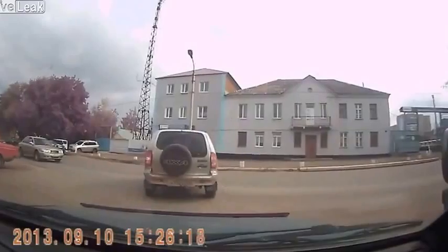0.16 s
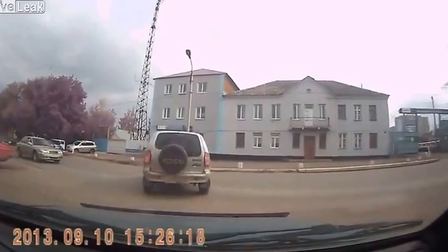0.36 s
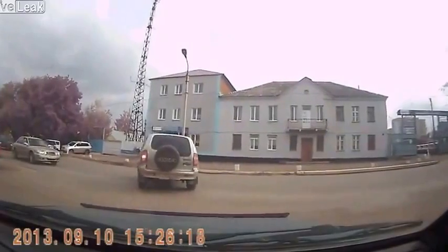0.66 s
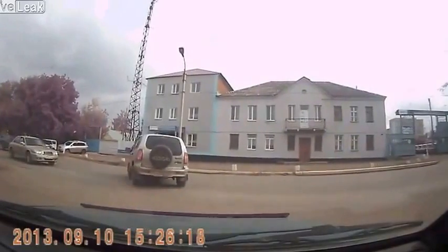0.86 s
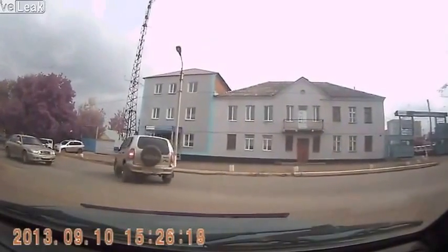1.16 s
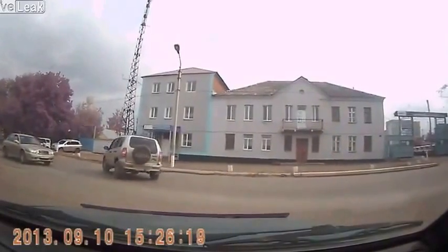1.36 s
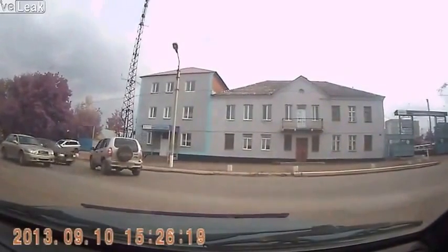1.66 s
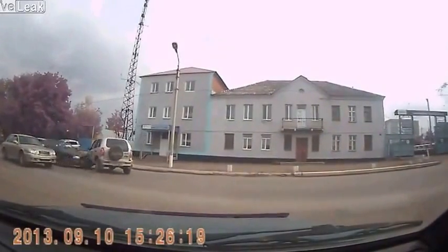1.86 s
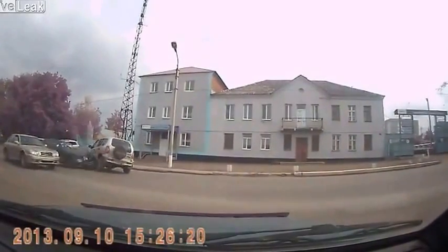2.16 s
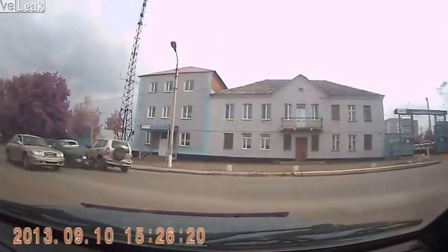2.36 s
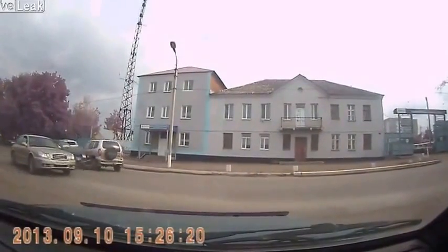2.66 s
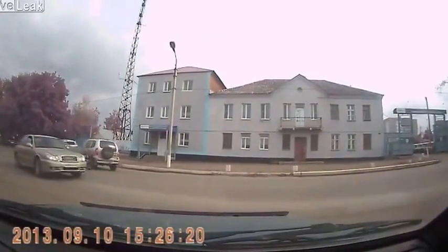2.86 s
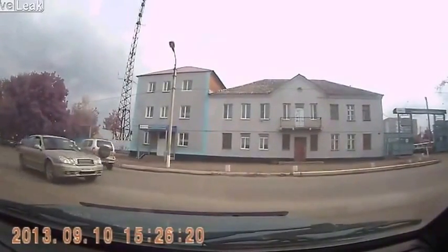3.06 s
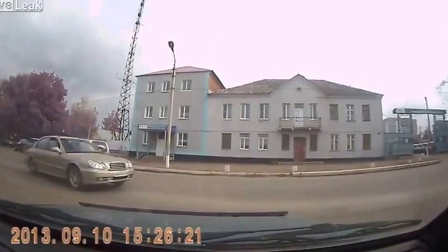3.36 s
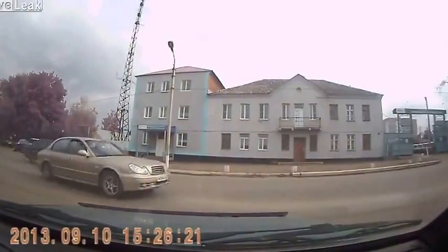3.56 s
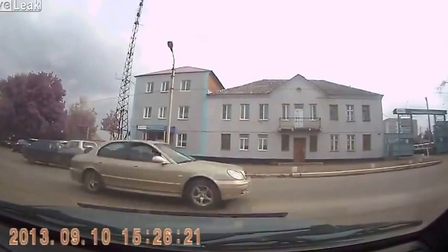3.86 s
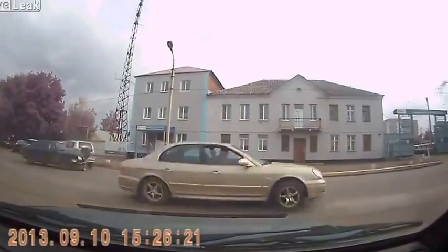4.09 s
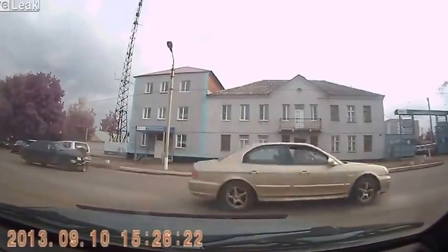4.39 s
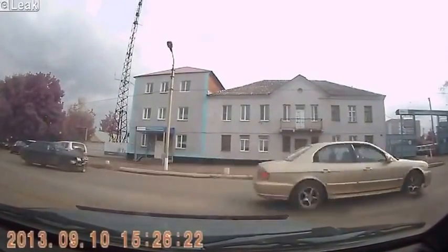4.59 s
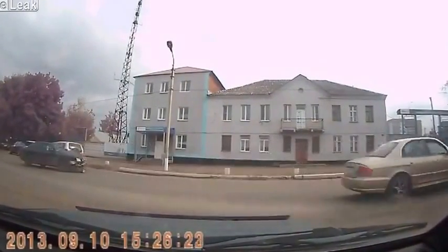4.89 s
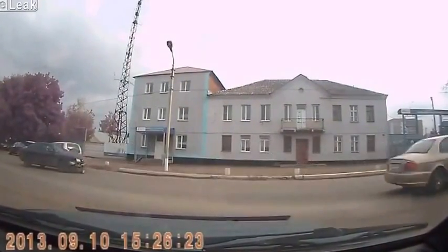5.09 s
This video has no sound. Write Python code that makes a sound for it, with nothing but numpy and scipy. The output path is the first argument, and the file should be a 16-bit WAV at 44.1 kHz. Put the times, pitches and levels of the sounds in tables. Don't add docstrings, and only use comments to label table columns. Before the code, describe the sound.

Inside an idling car, a low engine throb continues while tyres squeal roughly outside, cars meet in a dull metal crunch, then soft cabin thumps follow.

```python
import sys
import numpy as np
from scipy import signal
from scipy.fft import rfft, irfft
from scipy.io import wavfile
from scipy.ndimage import uniform_filter1d

SR = 44100
rng = np.random.default_rng(int(sys.argv[2]) if len(sys.argv) > 2 else 0)


def wav_out(sig):
    wavfile.write(sys.argv[1], SR, np.round(np.clip(np.atleast_2d(sig).T, -1, 1) * 32767).astype(np.int16))


def volts_from_db(level):
    exponent = np.asarray(level, float) / 20
    return 10 ** exponent


N = 230863

# (time [s], level [dB])
LOAD = [(0, -31.5), (.22, -18.5), (.36, -35), (.44, -35), (.6, -20.5), (.7, -29.5), (.9, -28),
        (1.15, -37.5), (1.5, -40.5), (2.05, -39.5), (2.15, -24), (2.42, -47), (2.65, -33), (3.15, -34),
        (3.5, -39), (4.3, -41.5), (4.9, -46.5), (5.23, -37)]
# (frequency [Hz], level per Hz [dB])
COLOUR = [(120, -35), (200, -3), (259, -0.5), (306, -4), (406, -8), (598, -11), (915, -16.5), (1310, -8.5),
          (1420, -20.5), (1720, -25.5), (2060, -16.5), (2440, -26.5), (3360, -24.5), (3680, -26),
          (4350, -26), (5660, -53), (9570, -120)]


def level(x):
    return x / np.sqrt(np.mean(x ** 2))


def curves(table):
    s, *columns = np.transpose(table)
    t = np.arange(N) / SR
    inside = 1.0 * ((t >= s[0]) & (t <= s[-1]))
    gate = uniform_filter1d(inside, size=441)
    return [np.interp(t, s, c) for c in columns] + [gate]


def bumps(rows, weights=None):
    t = np.arange(N) / SR
    weights = np.ones(len(rows)) if weights is None else weights
    return sum(w * r[1] * np.exp(-0.5 * ((t - r[0]) / r[2]) ** 2) for r, w in zip(rows, weights))


def arch(start, length, first_hz, last_hz, peak_db):
    share = np.array([0, 0.067, 1 - 0.14, 1])
    hz = first_hz + (last_hz - first_hz) * share
    db = peak_db - 16 * np.array([1, 0, 0, 1])
    return np.transpose([start + length * share, hz, db])


def walk(rate, size=N):
    k = int(SR / rate)
    steps = np.repeat(rng.standard_normal(N // 20)[:size // k + 1], k)
    return level(uniform_filter1d(uniform_filter1d(steps, k), k)[:size])


def shape(x, spectrum):
    hz, db = np.transpose(spectrum)
    grid = np.maximum(np.fft.rfftfreq(8192, 1 / SR), 1)
    ceps = irfft(np.interp(np.log(grid), np.log(hz), db) * np.log(10) / 20)
    ceps[1:4096] *= 2
    ceps[4097:] = 0
    response = irfft(np.exp(rfft(ceps)))[:4096]
    return signal.fftconvolve(x, response)[:len(x)]


def band(x, lo_hz, hi_hz):
    return level(signal.sosfilt(signal.butter(3, [lo_hz, hi_hz], "band", fs=SR, output="sos"), x))


def ring(x, hz, width):
    return signal.lfilter(*signal.iirpeak(hz, hz / width, SR), x)


def glass(x):
    # (frequency [Hz], width [Hz], level [dB])
    pane = [(1170, 150, -6.5), (1310, 150, -7.5), (1507, 120, 4.5), (1980, 220, -0.5), (2247, 92, 0),
            (2540, 150, 4), (2907, 130, 4), (3660, 68, 6.5), (4310, 130, -4)]
    return (x + sum(volts_from_db(db) * ring(x, f, w) for f, w, db in pane)) / 1.905


def engine():
    # (time [s], firing rate [Hz], boom level [dB])
    firings = [(0, 25.58, -19), (.2, 26.03, -18.5), (.3, 26.6, -14.5), (.5, 27.12, -20), (.68, 24, -15),
               (.8, 23.48, -20.5), (1.02, 23.53, -23.5), (1.2, 23.5, -21.5), (1.31, 31.4, -23),
               (1.5, 31.08, -23), (1.9, 30.4, -29.5), (2.14, 29.77, -23.5), (2.65, 28.65, -23.5),
               (3.2, 29.12, -27), (3.56, 28.09, -20.5), (3.95, 29.37, -25), (4.15, 29, -18.5),
               (5.23, 29.6, -21.5)]
    # (time [s], change [dB], half length
    # [s])
    stumbles = [(.43, -20.5, 0.02), (.9, -6.5, 0.046), (1.12, -9, 0.018), (1.22, -11, .025),
                (2.44, -13.5, 0.09), (2.79, -3.5, 0.024), (3.22, -2, 0.026), (3.34, 0.5, .04),
                (4.3, -6, 0.025), (4.72, -2.5, .03), (4.96, -2, 0.063), (5.1, 2.5, .04)]
    hz, boom_db, _ = curves(firings)
    load_db, _ = curves(LOAD)
    pulling = uniform_filter1d(1.0 * (np.arange(N) < 1 * SR), size=2000)
    turns = 0.17 + np.cumsum(hz * (1 + 0.0097 * walk(20))) / SR

    boom = volts_from_db(boom_db + bumps(stumbles)) * np.sin(2 * np.pi * turns)
    boom += volts_from_db(load_db + 4.4 * walk(22)) * np.sin(4 * np.pi * turns + 0.72)
    boom += pulling * volts_from_db(load_db - 18 + 2.7 * walk(2.7)) * np.sin(6 * np.pi * turns + 5.4)
    boom += pulling * volts_from_db(load_db - 13.5 + 1.9 * walk(8)) * np.sin(10 * np.pi * turns + 2.2)
    return np.sqrt(2) * boom, turns % 1


def cabin(phase):
    # (time [s], level [dB])
    traffic = [(0, -32), (.21, -30), (.39, -45.5), (.46, -46), (.5, -38.5), (.72, -37), (.8, -45.5),
               (1.2, -49), (2.05, -47), (2.79, -47), (2.85, -43), (3.0, -41.5), (3.25, -45), (3.62, -46.5),
               (4.08, -43), (4.5, -44), (4.9, -43), (5.23, -39)]
    # (time [s], change [dB], half length [s], lean to the bass [share])
    jolts = [(0.505, 4.5, 0.03, 1), (.64, 2, 0.045, 0.65), (1.01, 4.5, 0.018, .5), (1.4, 4.5, 0.025, .3),
             (2.56, -1, .09, 1), (2.971, 1, 0.035, -3), (3.122, 2, 0.046, -0.94), (3.231, 2, 0.055, 0.77),
             (3.446, 8, 0.04, 0.86), (3.55, 6, 0.017, 0.55), (3.798, 6.5, 0.018, -0.35),
             (3.924, 11, 0.032, 0.21), (4.056, 7.5, 0.048, .3), (4.622, 2, 0.026, -1.5),
             (4.716, 5, 0.037, 0.95), (4.78, -1, 0.071, 1), (4.865, -3, .025, 0.23),
             (5.002, 4, 0.026, -1.23), (5.139, 4.5, 0.023, -0.38)]
    # (frequency [Hz], width [Hz], level [dB])
    panels = [(55, 16, -3), (81.4, 30, 0), (135, 47.4, -1)]
    # (frequency [Hz], width [Hz], level [dB])
    hollow = [(325, 42, -14.5), (554, 150, -8)]
    base_db, _ = curves(traffic)
    jolt_db, lean_db = bumps(jolts), bumps(jolts, np.transpose(jolts)[3])
    mid_db = base_db + jolt_db
    low_db = -35 + 0.65 * (mid_db + 41) + lean_db + 0.3 * (curves(LOAD)[0] + 38)
    high_db = -57.5 + 0.88 * (mid_db + 42.5) - lean_db

    depth = np.clip(0.32 + 0.045 * walk(3), 0, 1)
    puff = level(np.exp(-((phase - 0.3) % 1) / 0.35))
    throb = 1 - depth + depth * puff

    rumble = 0
    for f, w, db in panels:
        rumble = rumble + volts_from_db(db + 2.1 * walk(9)) * level(ring(ring(rng.standard_normal(N), f, w), f, w))
    noise = shape(rng.standard_normal(N) * volts_from_db(1.2 * walk(400)), COLOUR)
    low = signal.sosfiltfilt(signal.butter(2, 850, fs=SR, output="sos"), noise)
    air = level(low) + sum(volts_from_db(db) * level(ring(low, f, w)) for f, w, db in hollow)
    hiss = level(glass(noise - low))

    out = volts_from_db(low_db + 0.5) * level(rumble)
    out += volts_from_db(mid_db - 1 + 1.2 * walk(25)) * air * throb ** 0.6
    return out + volts_from_db(high_db + 6 + 1.2 * walk(30)) * hiss * throb


def squeal(table, overtones_db, wander, spread, flutter_db, count, scrub_db, grabs_db=np.zeros(N), smear=1.0):
    columns = curves(table)
    on = columns[-1] > 0
    hz, slide_db, gate = (c[on] for c in columns)
    peak_db, grip_db, n = np.max(slide_db), slide_db + grabs_db[on], len(hz)
    dbs = [grip_db] + [peak_db + db + 0.7 * (grip_db - peak_db) for db in overtones_db]

    waves = np.zeros((3, n))
    for k in range(count):
        offset = spread * (k - (count - 1) / 2)
        jitter = wander * (0.35 * walk(30, size=n) + walk(300, size=n))
        turns = np.cumsum(hz * (1 + offset + jitter)) / SR
        blur = np.cumsum(hz * wander * smear * walk(350, size=n)) / SR
        grip = volts_from_db(flutter_db * np.tanh(0.8 * walk(85, size=n)))
        for h in range(3):
            waves[h] += grip * np.sin(2 * np.pi * ((h + 1) * turns + h * blur))

    scrub = volts_from_db(dbs[1] + scrub_db) * band(rng.standard_normal(N)[:n], 1400, 4600)
    out = np.zeros(N)
    out[on] = gate * (scrub + sum(volts_from_db(db) * level(w) for db, w in zip(dbs, waves)))
    return out


def tyres():
    # (time [s], slip rate [Hz], level [dB])
    bite = [(.8, 1520, -72.5), (.92, 1556, -58.5), (.99, 1385, -37.5), (1.19, 1387, -34.5)]
    outer = [(1.17, 1330, -46), (1.25, 1310, -29.5), (1.55, 1310, -30.5), (1.64, 1312, -30.5),
             (1.8, 1311, -26), (1.9, 1293, -23.5), (2.04, 1319, -28), (2.16, 1310, -24),
             (2.24, 1332, -54.5)]
    inner = [(1.2, 1180, -47.5), (1.32, 1170, -41.5), (1.64, 1170, -38), (1.8, 1145, -32.5),
             (1.87, 1170, -26.5), (1.92, 1158, -32), (2.0, 1164, -25), (2.1, 1115, -33), (2.2, 1170, -42.5)]
    # (time [s], gain [dB], half length [s])
    bite_grabs = [(.82, 12, .015), (.865, -4.5, .012), (.915, 11.5, .022), (.965, -9.5, 0.021),
                  (.995, -0.5, 0.0087), (1.045, 6.5, 0.013), (1.125, -15.5, 0.027)]
    outer_grabs = [(1.3, -2, 0.029), (1.4, -0.5, 0.0082), (1.49, -1, 0.017), (1.565, 2, 0.0067),
                   (1.622, 10, .012), (1.718, 6.5, .02), (1.8, -1, 0.013), (1.87, 0, 0.027),
                   (1.925, -5, .012), (2.04, 6.5, 0.011)]
    inner_grabs = [(1.678, 2, .015), (1.826, 11.5, 0.0072), (1.87, 6, .012), (1.912, -4, .012),
                   (1.965, 10, 0.037), (2.018, 6, 0.011), (2.116, 8, 0.028)]
    # (start [s], length [s], first pitch [Hz],
    # last pitch [Hz], peak level [dB])
    slides = [
        (0.982, 0.13, 1490, 1480, -51.5),
        (1.335, 1, 1030, 1118, -50.5),
              (2.205, .175, 975, 1003, -44),
        (2.31, .15, 1190, 1135, -39),
    ]
    first, dragged, pushed, last = [arch(*row) for row in slides]
    rough = dict(wander=0.018, spread=0.034, count=3, smear=0.5, flutter_db=9)

    dry = squeal(outer, overtones_db=(-17, -28), scrub_db=-7.5, grabs_db=bumps(outer_grabs), **rough)
    dry += squeal(inner, overtones_db=(-13, -28), scrub_db=-7.5, grabs_db=bumps(inner_grabs), **rough)
    dry += squeal(bite, overtones_db=(-30, -40), scrub_db=-8, grabs_db=bumps(bite_grabs), **rough)
    dry += squeal(first, overtones_db=(-6, -25), wander=0.028, spread=0.03, flutter_db=7.5, count=3, scrub_db=-20)
    dry += squeal(pushed, overtones_db=(2.5, -24), wander=0.018, spread=0, flutter_db=2.5, count=1,
                  smear=0.28, scrub_db=-25.5)
    dry += squeal(last, overtones_db=(-30, -38), wander=0.024, spread=0, flutter_db=4, count=1, scrub_db=-7)
    dry += squeal(dragged, overtones_db=(3, -14), wander=0.018, spread=0.07, flutter_db=7, count=2, scrub_db=-9)
    return glass(dry)


def knocks():
    # (time [s], peak level [dB], pitch [Hz], ring time [s])
    thumps = [(2.106, -17, 140.5, 0.1), (3.201, -15, 116, 0.043), (3.231, -17.5, 116.7, 0.13),
              (3.427, -7, 114.3, 0.049), (3.547, -34, 81, 0.11), (3.668, -27, 88.1, 0.06),
              (3.768, -22, 103.2, 0.028), (3.882, -21, 123.6, 0.025), (3.947, -28, 155, 0.041),
              (3.428, -20.5, 234, 0.035), (4.07, -30, 300, 0.021), (3.548, -37.5, 396, 0.057),
              (5.189, -20, 410, 0.011)]
    # (time [s], peak level [dB], brightness [dB], length [s])
    ticks = [(0.861, -40.5, -18, 0.027), (2.445, -25.5, -0.5, 0.025), (3.775, -37.5, -11, 0.022),
             (4.071, -17, -44.5, 0.037), (4.091, -28, -3, 0.011), (4.152, -31, -24, 0.016),
             (4.691, -21.5, -10, 0.041), (4.735, -53, -8, 0.018), (4.819, -51, 8, .015),
             (4.911, -39.5, 7, .02), (5.13, -41, -12, .025)]
    out, t = np.zeros(N + SR), np.arange(SR // 4) / SR
    for s, db, hz, t60 in thumps:
        swell = (1 - np.exp(-t / 0.011)) * np.exp(-(3 * t / t60) ** 2)
        knock = 0.021 * band(rng.standard_normal(len(t)), 320, 790)
        body = swell * (knock - np.sin(2 * np.pi * hz * t))
        out[int(s * SR):][:len(t)] += volts_from_db(db) * body / np.max(np.abs(body))
    for s, db, bright_db, t60 in ticks:
        snap = rng.standard_normal(len(t)) * np.exp(-np.log(1000) * t / t60)
        body = level(ring(snap, 1277, 160) + 0.35 * ring(snap, 2100, 330) + 0.19 * ring(snap, 310, 250))
        body = body + volts_from_db(bright_db) * band(snap, 2290, 4350)
        out[int(s * SR):][:len(t)] += volts_from_db(db) * body / np.max(np.abs(body))
    return out[:N]


def crunch():
    # (time [s], level [dB])
    blows = [
        (2.062, 0.5),
        (2.105, 0),
        (2.191, -21),
        (2.26, -14.5),
    ]
    # (level [dB], time to fade by 60 dB [s])
    crack_bands = [(-20, .55), (-22, .5), (-52.5, 0.85)]
    since = [np.maximum(np.arange(N) / SR - s, 0) for s, _ in blows]
    gains = []
    for band_db, t60 in crack_bands:
        swells = 0
        for t, (_, db) in zip(since, blows):
            bite = 1 - np.exp(-t / 0.0089)
            swells = swells + volts_from_db(db) * bite * np.exp(-np.log(1000) * t / t60)
        gains.append(volts_from_db(band_db) * swells)
    low_gain, mid_gain, high_gain = gains

    cracks = rng.standard_normal(N) * volts_from_db(2.5 * walk(150))
    low = level(band(cracks, 100, 170) + 0.5 * level(ring(cracks, 110, 15)))
    high = level(shape(band(cracks, 1100, 4300), COLOUR))
    return low_gain * low + mid_gain * band(cracks, 170, 600) + volts_from_db(15.5) * high_gain * high


def street(dry, t60, wet_db):
    t = np.arange(SR // 2) / SR
    tail = rng.standard_normal(len(t)) * np.exp(-np.log(1000) * t / t60) * (t > 0.012)
    return dry + volts_from_db(wet_db) * signal.fftconvolve(dry, tail / np.sqrt(np.sum(tail ** 2)))[:N]


def rustle(rows, wander):
    hz, db, _ = curves(np.vstack([arch(*row) for row in rows]))
    gate = sum(curves(arch(*row))[-1] for row in rows)
    strands = sum(np.sin(2 * np.pi * np.cumsum(hz * (1 + wander * walk(120))) / SR) for _ in range(4))
    return gate * volts_from_db(db) * level(strands)


def scene():
    # (start [s], length [s], first pitch [Hz], last pitch [Hz], peak level [dB])
    brakes = [
        (2.88, 0.22, 1300, 1300, -48.5),
        (3.06, 0.13, 1355, 1310, -46),
    ]
    rustles = [
        (4.43, .12, 2217, 2020, -52.5),
        (4.59, 0.072, 2050, 1994, -60.5),
        (4.98, .07, 2100, 2070, -63),
    ]
    drones = [
        (4.62, 0.12, 522, 512.6, -42),
        (4.89, 0.3, 533.6, 516.7, -40),
        (5.15, 0.2, 504, 493, -47.5),
    ]
    boom, phase = engine()
    outside = street(tyres() + crunch(), t60=0.3, wet_db=-8)
    passing = rustle(rustles, wander=0.045) + rustle(drones, wander=0.1) + rustle(brakes, wander=0.035)
    return (boom + cabin(phase) + outside + knocks() + passing)[None]


def band_limit(x):
    return signal.sosfilt(signal.butter(12, 9345, fs=SR, output="sos"), x)


def record(dry):
    dry = np.tanh(1.541 * dry) / 1.776
    top = signal.cheby2(8, 55, 5665, fs=SR, output="sos")
    settled = signal.sosfilt_zi(top)[:, None] * dry[0, 0]
    x = signal.sosfilt(top, dry, zi=settled)[0]
    swing = uniform_filter1d(np.abs(x), size=64)
    whine = np.sin(2 * np.pi * 7790 * np.arange(N) / SR)
    return band_limit(x + volts_from_db(-63) * swing * whine)


dry = scene()
out = record(dry)
wav_out(out)
```